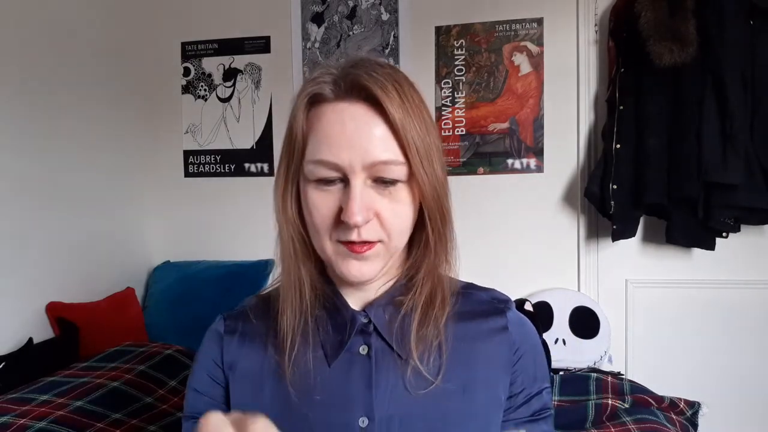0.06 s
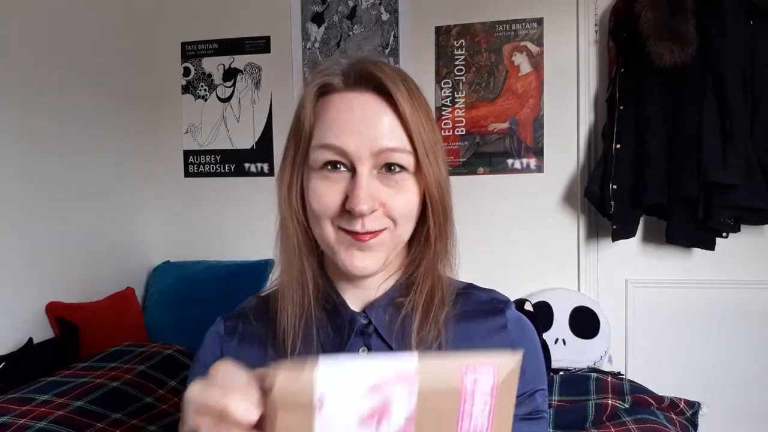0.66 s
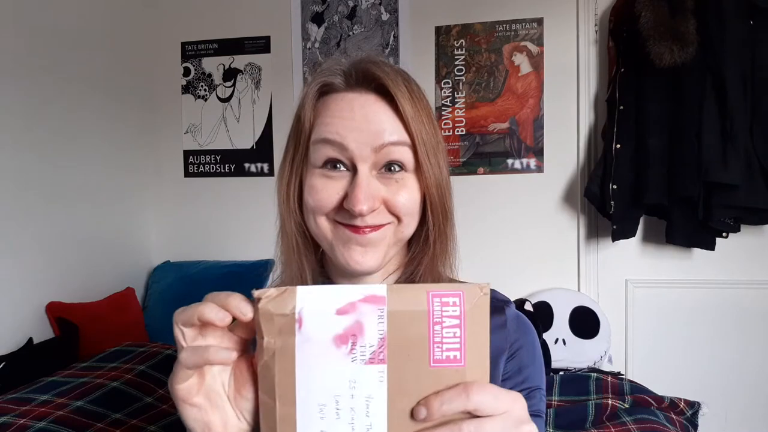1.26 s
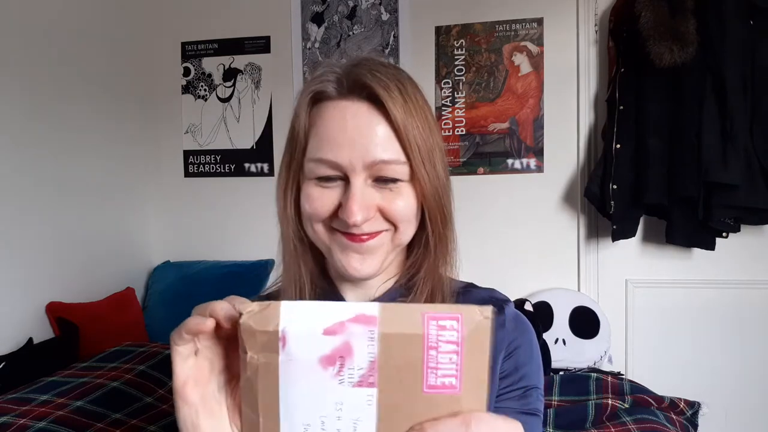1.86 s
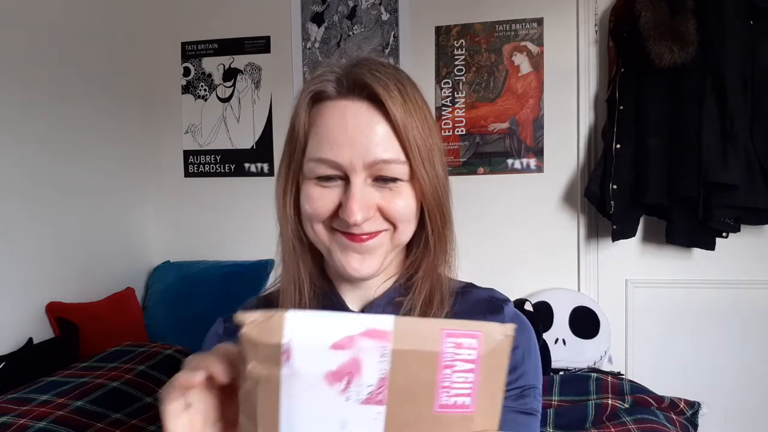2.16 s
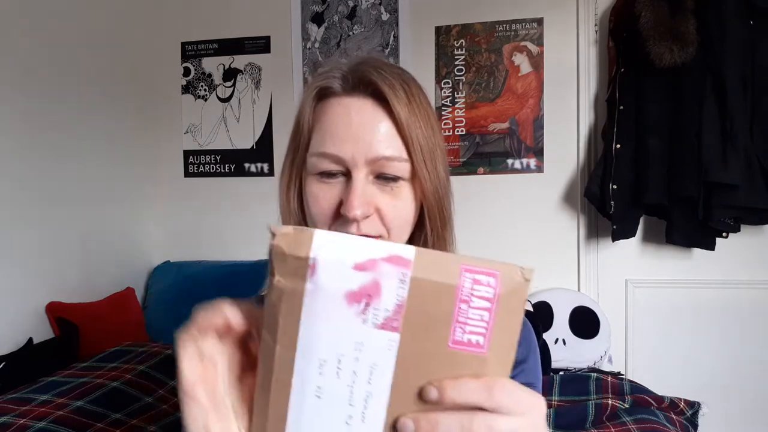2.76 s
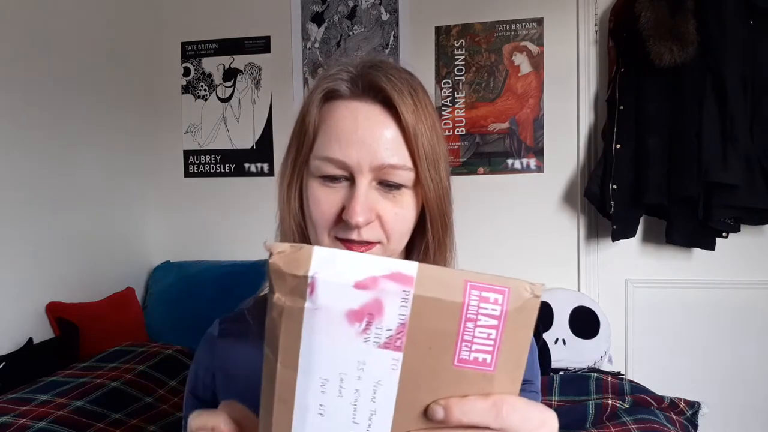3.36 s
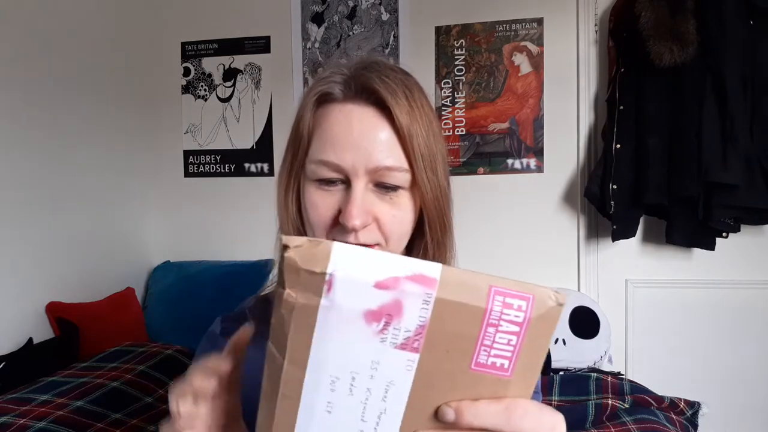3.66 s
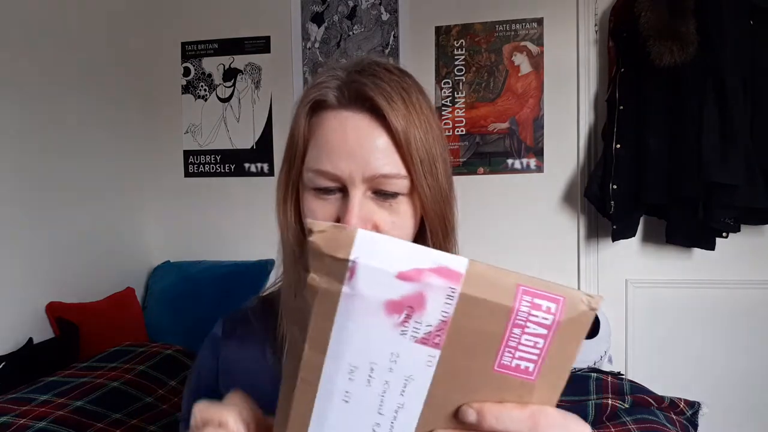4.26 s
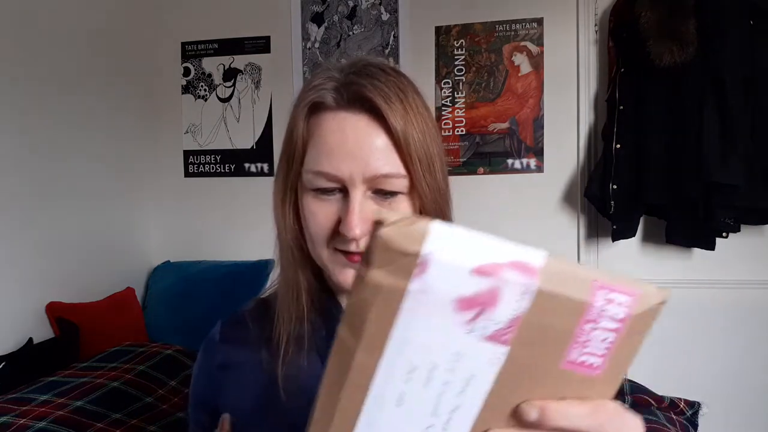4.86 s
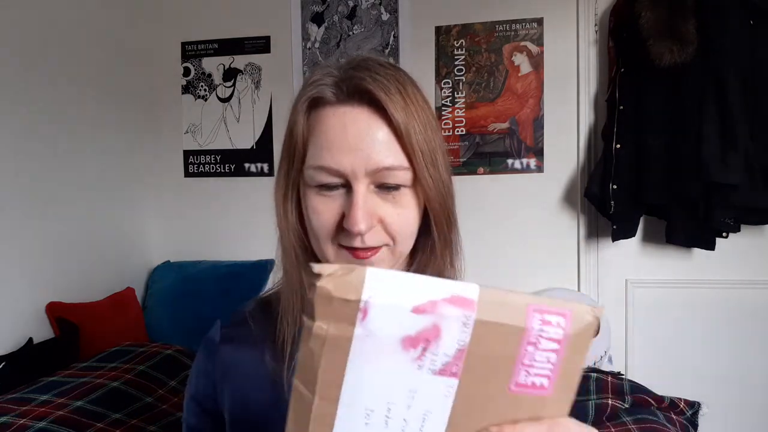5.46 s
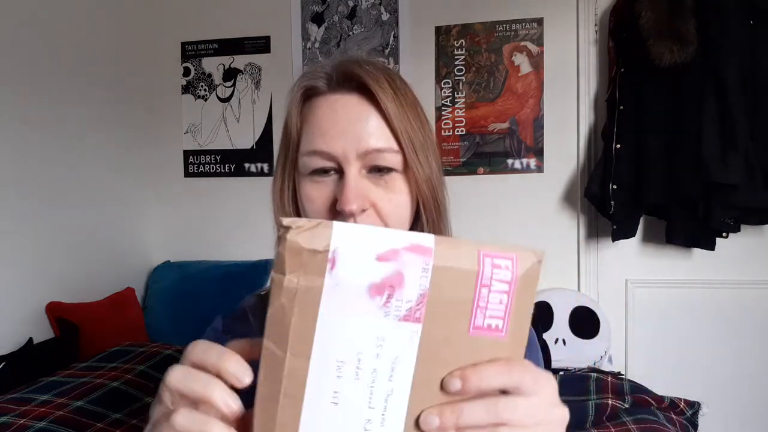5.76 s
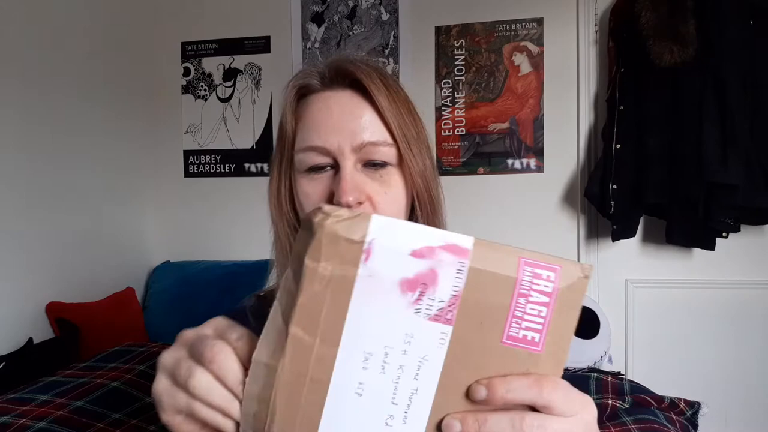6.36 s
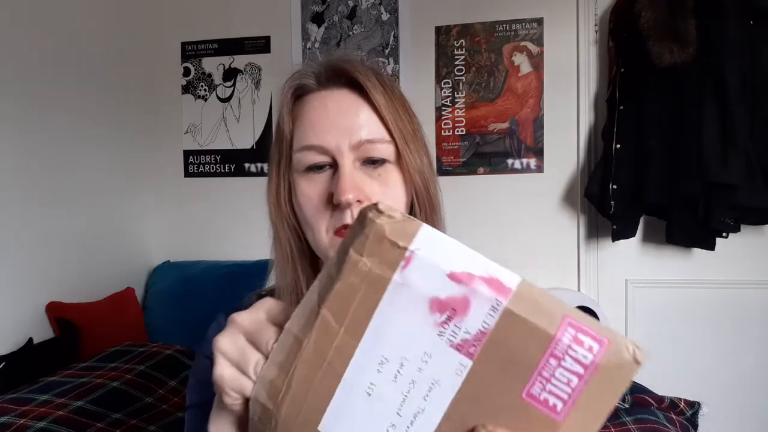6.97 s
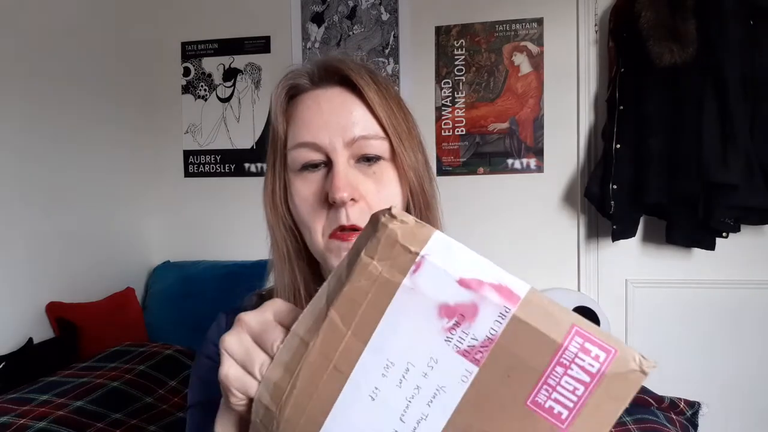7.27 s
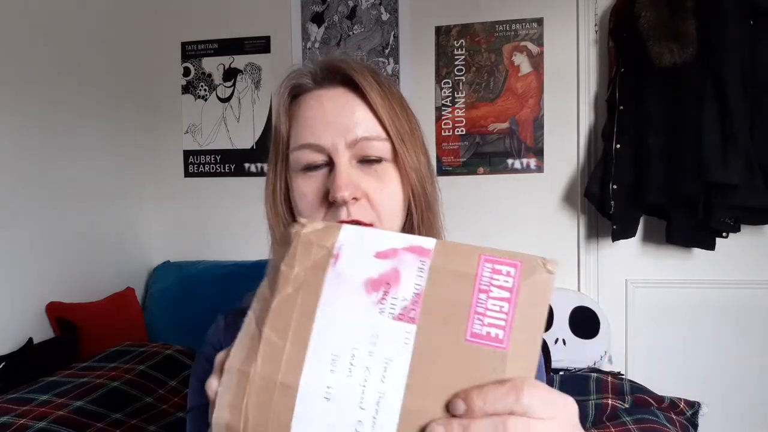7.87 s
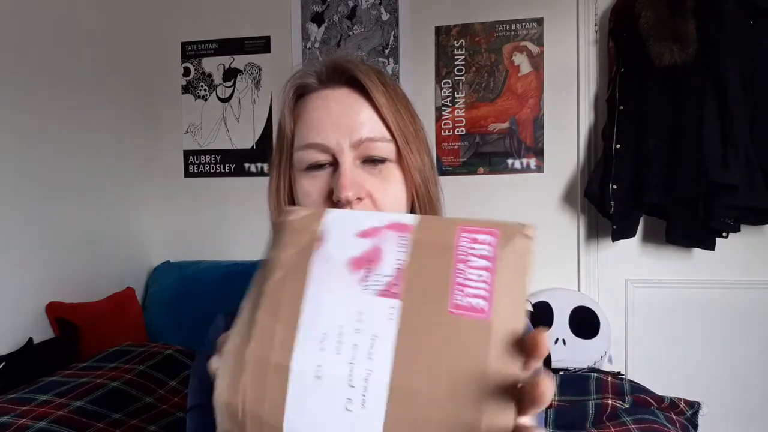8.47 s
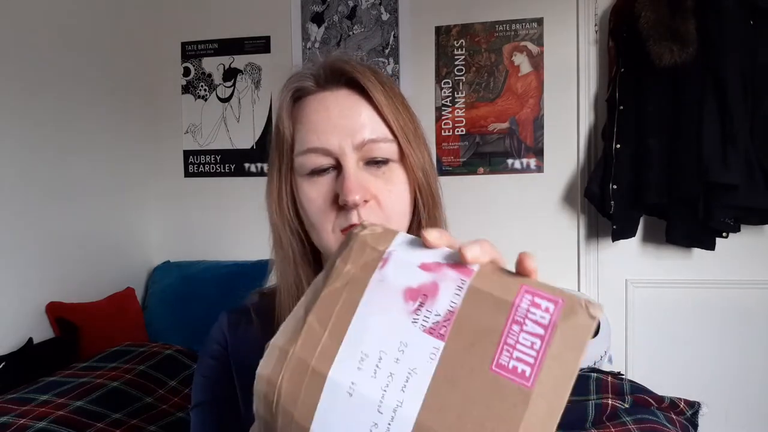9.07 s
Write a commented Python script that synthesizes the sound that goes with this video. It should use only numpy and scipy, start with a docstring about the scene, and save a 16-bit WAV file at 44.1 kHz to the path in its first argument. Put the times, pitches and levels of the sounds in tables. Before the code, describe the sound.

Hands tear open a paper-wrapped parcel in short rips, with crinkling, sharp snaps and rubbing, close by in a small room.

```python
"""A small furnished room: close by, hands open a parcel in brown paper.
Strips tear off in short pulls; breaking fibres rip, fizz and drum on the taut sheet.
Creases buckle with sharp snaps that thump the parcel, fingers rub over the paper's grain,
and a hand bumps the parcel softly. Short echoes; faint air, hiss and mains hum behind."""
import sys
import numpy as np
from scipy import signal
from scipy.fft import rfft, irfft
from scipy.io import wavfile

SR = 44100
rng = np.random.default_rng(int(sys.argv[2]) if len(sys.argv) > 2 else 0)


def transcribe(u):
    """Save the signal u as a 16-bit wav file named by the first command-line argument.

    u: samples, shape (n,) or (channels, n), limited to [-1, 1]; the rate is SR.
    q: integer samples, one column per channel.
    """
    v = np.clip(np.atleast_2d(u).T, -1, 1)
    q = np.round(v * 32767).astype(np.int16)
    wavfile.write(sys.argv[1], SR, q)


N = 407043

# Levels are relative within each layer.
# tearing pulls: start/s, rise/s, length/s, rip/dB, drum/dB, fizz/dB
TEAR_PULLS = [(0.589, 0.038, 0.05, -50, -63.5, -57.5), (0.847, 0.01, 0.012, -55, -53, -49.5),
              (1.822, 0.026, 0.053, -51.5, -47.5, -48.5), (2.009, 0.048, 0.07, -51.5, -49.5, -46),
              (2.644, 0.017, 0.095, -43, -43, -42), (2.748, 0.048, 0.13, -43, -44.5, -46.5),
              (2.978, 0.082, 0.14, -48, -51.5, -52.5), (3.177, 0.071, 0.14, -44, -49.5, -53),
              (3.328, 0.037, 0.086, -39, -42, -54.5), (4.024, 0.073, 0.18, -37, -36.5, -49),
              (4.171, 0.072, 0.08, -40, -48.5, -54), (4.323, 0.04, 0.094, -43.5, -46, -46.5),
              (4.447, 0.078, 0.067, -34.5, -35.5, -42), (7.403, 0.1, 0.09, -44.5, -45.5, -51.5)]
# buckling creases: t/s, facet f/Hz, facet/dB, crack/dB
CREASE_SNAPS = [(0.066, 620, -55, -62), (0.1155, 1720, -103, -51), (0.218, 1200, -79, -46.5),
                (0.2314, 1210, -38, -46), (0.474, 576, -66, -59), (0.6392, 640, -42, -48),
                (0.789, 900, -50.5, -64), (0.8107, 680, -49, -58), (0.9513, 1100, -58.5, -57.5),
                (1.225, 950, -51, -61.5), (2.2586, 870, -55.5, -69), (2.426, 700, -55, -61),
                (2.4603, 915, -50, -60), (2.563, 690, -49, -70), (2.9298, 1850, -45.5, -48),
                (3.1895, 1560, -53.5, -47.5), (3.8236, 710, -50.5, -58), (3.931, 1230, -58, -47),
                (4.039, 700, -55, -43), (4.303, 1100, -43, -48), (4.463, 1270, -40, -37),
                (4.519, 1500, -32, -36.5), (5.703, 906, -60.5, -84), (5.785, 650, -53, -59),
                (5.885, 1700, -54, -58.5), (6.0737, 570, -36.5, -40), (6.267, 730, -57, -75),
                (6.3082, 880, -47, -57), (6.3858, 1060, -48, -61), (6.9292, 864, -40, -64),
                (7.3895, 820, -31.5, -47.5), (7.8708, 725, -44, -56.5), (7.944, 820, -41.5, -49),
                (8.2124, 750, -38, -58), (8.2776, 740, -33, -50), (8.34, 960, -42, -67),
                (8.355, 930, -31.5, -41.5), (8.3997, 990, -38.5, -57), (8.4194, 960, -27.5, -48),
                (8.6796, 920, -38, -67), (8.753, 714, -40.5, -66), (8.7934, 940, -46, -77),
                (8.8074, 825, -36.5, -80), (8.8339, 1300, -31.5, -44.5)]
# tiny high ticks, of paper or a lip click: t/s, level/dB
THIN_TICKS = [(0.249, -44.5), (0.256, -60), (0.267, -56), (1.4235, -52.5)]
# hand strokes: centre/s, half length/s, rub/dB, hiss/dB
HAND_STROKES = [(0.068, 0.019, -66, -59.5), (0.138, 0.0039, -68, -57), (0.244, 0.02, -76, -46),
                (0.355, 0.014, -54.5, -72), (0.574, 0.0078, -50.5, -53.5), (0.763, 0.03, -63, -53.5),
                (1.095, 0.013, -60.5, -65), (1.228, 0.025, -57, -64), (1.81, 0.012, -68, -49),
                (2.573, 0.059, -64.5, -52.5), (2.929, 0.014, -53.5, -64), (3.89, 0.035, -54.5, -74),
                (3.99, 0.099, -62, -56.5), (5.815, 0.083, -60, -77), (6.028, 0.024, -72.5, -66.5),
                (6.209, 0.0076, -53.5, -47), (6.443, 0.012, -52, -50), (6.547, 0.024, -58, -51.5),
                (6.75, 0.047, -64.5, -61.5), (7.526, 0.027, -47.5, -67), (7.948, 0.023, -80, -46),
                (8.596, 0.034, -52.5, -52), (8.68, 0.029, -52.5, -61), (9.157, 0.044, -43, -57)]
# shifting grip: start/s, end/s, rub/dB
FINGER_GRIPS = [(0.064, 1.358, -69.5), (5.7, 5.93, -78), (6.156, 6.42, -57.5), (6.498, 6.667, -70.5),
                (6.915, 7.042, -66.5), (7.291, 8.209, -61), (8.521, 9.24, -60)]
# hand against parcel: t/s, peak/dB
HAND_BUMPS = [(6.076, -55), (8.21, -44), (8.28, -45), (8.455, -50.5), (8.916, -46)]
# modes of the loose sheet: f/Hz, width/Hz, level/dB
LOOSE_MODES = [(73.7, 7.5, -23), (184.3, 32, 3.5), (327.4, 130, -6), (422.4, 88, 1), (536, 38, -3),
               (930, 44, -9.5)]
# fibre bundles breaking: f/Hz, level/dB
RIP_SPECTRUM = [(450, -10.5), (720, -7.5), (900, 0.5), (1150, -7.5), (1700, -1.5), (3400, -8), (7500, -18)]
# fine fibres: f/Hz, level/dB
FIZZ_SPECTRUM = [(2500, -6.5), (4900, -3), (7500, -4), (9500, -9), (15800, -11)]
# skin on paper: f/Hz, level/dB
RUB_SPECTRUM = [(400, -7.5), (800, 1.5), (1200, 4), (2000, 1.5), (3800, -3.5), (8000, -12.5)]
# hollow parcel: f/Hz, level/dB
PARCEL_SPECTRUM = [(60, -7.5), (150, -35.5), (360, 3), (600, 6.5), (1000, -26.5)]
# still room: f/Hz, level/dB
AIR_SPECTRUM = [(25, -24), (55, -3), (110, -7), (350, -6), (700, -14), (4500, -19), (8700, -29),
                (11500, -15), (15800, -14)]
# direct sound: f/Hz, power share/1
DIRECT_SHARE = [(250, 0.78), (1000, 0.81), (4000, 0.62), (10000, 0.48)]
# left over right: f/Hz, level/dB
LEFT_BIAS = [(900, 4), (12000, 1)]


def tearing():
    """Fibres break in clumps as the tear sticks and runs; their tugging drums on the sheet."""
    rip_gain, drum_gain, fizz_gain = pull_gains()
    clumps = rms_one(from_db(2.5 * drift(rate_hz=420) + 1.6 * drift(rate_hz=97)))
    bundles = grains(per_s=2800, spread_db=0.5) * clumps
    fibres = grains(per_s=14000, spread_db=1.5) * clumps
    rip = from_db(5) * rip_gain * coloured(bundles, RIP_SPECTRUM)
    fizz = from_db(6) * fizz_gain * coloured(bundles + fibres, FIZZ_SPECTRUM)
    drum = from_db(4) * drum_gain * sheet(rms_one(bundles / np.sqrt(clumps)))
    return rip + fizz + drum


def pull_gains(stop_s=0.009, stop_share=0.055):
    """Each pull speeds up, runs and dies away; fizz comes in early, drumming only at speed."""
    t, gains = np.arange(N) / SR, 0
    for start_s, rise_s, length_s, *levels_db in TEAR_PULLS:
        stopping = np.clip(t - start_s - length_s, 0, 1) / (stop_s + stop_share * length_s)
        speed = np.clip((t - start_s) / rise_s, 0, 1) * np.exp(-stopping)
        rip, drum, fizz = speed, speed ** 1.27, speed ** 0.69
        gains = gains + from_db(levels_db)[:, None] * np.array([rip, drum, fizz])
    return gains


def sheet(drive, tight_hz=554, loose_from_s=2.6):
    """The wrapping rings in one mode while tight, in several, mostly lower, once loose."""
    click = 1.0 * (np.arange(SR // 2) == 0)
    tight_ring = resonance(click, tight_hz, width_hz=110)
    loose_ring = sum((-1) ** k * from_db(db) * resonance(click, hz, width_hz)
                     for k, (hz, width_hz, db) in enumerate(LOOSE_MODES))
    loose = np.arange(N) > loose_from_s * SR
    return sum(signal.oaconvolve(drive * when, ring / np.linalg.norm(ring))[:N]
               for when, ring in [(~loose, tight_ring), (loose, loose_ring)])


def snaps(give_s=0.00058, settle_s=0.0022, span_s=0.0023, chatter=0.27, crack_q=1.7):
    """A crease flips over: its facet rings, the fold cracks, the parcel thumps."""
    facets, thumps, cracks = np.zeros((3, N))
    size, lead = 1024, 200
    t = (np.arange(size) - lead) / SR
    envelope = np.exp(-np.maximum(t / settle_s, -t / give_s))
    for at_s, facet_hz, facet_db, crack_db in CREASE_SNAPS:
        at = round(at_s * SR) - lead + np.arange(size)
        flip = (t == 0) + chatter * rng.standard_normal(size) * envelope
        flip *= np.sqrt(span_s * SR) / np.linalg.norm(flip)
        ring = resonance(resonance(flip, facet_hz, width_hz=facet_hz), facet_hz, width_hz=2300)
        facets[at] += from_db(facet_db) * with_energy(ring, flip)
        thump_db = facet_db - 17 * np.log2(facet_hz / 700)   # large, low facets thump harder
        thumps[at] += from_db(thump_db) * flip
        crack_hz = min(3750 * 2 ** ((crack_db - facet_db) / 41), SR / 4)   # brighter as it stands out
        crack = resonance(flip, crack_hz, crack_hz / crack_q)
        cracks[at] += from_db(crack_db) * with_energy(crack, flip)
    body = from_db(6.5) * coloured(thumps, PARCEL_SPECTRUM) + from_db(-4) * sheet(thumps)
    return from_db(6) * facets + body + from_db(9.5) * cracks


def settling(re_crack_db=-4.5, decay_s=0.023):
    """The paper settles after each snap with a brief fine crackle."""
    starts = np.zeros(N)
    for at_s, _, _, crack_db in CREASE_SNAPS:
        starts[round(at_s * SR)] = from_db(crack_db + re_crack_db)
    envelope = signal.lfilter([1], [1, -np.exp(-1 / (decay_s * SR))], starts + 1e-18)
    return envelope * coloured(grains(per_s=12000, spread_db=-3.5), RIP_SPECTRUM)


def sliding():
    """Skin catches on the paper's grain; the sheet gives in crinkles and pops."""
    rub_gain, sheet_gain, hiss_gain = hand_gains()
    friction = grains(per_s=14000, spread_db=0.5) * rms_one(from_db(2.23 * drift(rate_hz=110)))
    crinkles = grains(per_s=220, spread_db=3.5)
    catching = friction + from_db(-5.5) * crinkles
    light_touch = highpass(catching, 267, order=4)   # barely moves the low modes
    rub = from_db(1) * coloured(catching, RUB_SPECTRUM) + from_db(-3) * pops()
    ring = from_db(0.16) * sheet(light_touch)
    hiss = from_db(-1.5) * coloured(friction + from_db(-16) * crinkles, FIZZ_SPECTRUM)
    return rub_gain * rub + sheet_gain * ring + hiss_gain * hiss


def hand_gains(edge_s=0.0039, waver_db=3, grip_hiss_db=-28.5):
    """Strokes swell and fade over a restless grip; the sheet follows the rub in part."""
    t = np.arange(N) / SR
    grip = sum(from_db(db) * np.clip(np.minimum(t - start_s, end_s - t) / edge_s, 0, 1)
               for start_s, end_s, db in FINGER_GRIPS)
    grip *= from_db(waver_db * drift(rate_hz=14))
    stroke_power = sum(from_db(levels_db)[:, None] ** 2 * (1 - np.tanh((t - centre_s) / half_s) ** 2)
                       for centre_s, half_s, *levels_db in HAND_STROKES)
    rub_gain, hiss_gain = np.sqrt(stroke_power + np.array([grip, from_db(grip_hiss_db) * grip]) ** 2)
    sheet_gain = from_db(-59) * (rub_gain / from_db(-49)) ** 0.56
    return rub_gain, sheet_gain, hiss_gain


def pops(low_hz=316, high_hz=1700, q=2.6, sizes=5):
    """Dents of several sizes pop at random, each with a short hollow ring; rms 1."""
    clicks = grains(per_s=51, spread_db=1)
    dent = rng.integers(0, sizes, N)
    out = np.zeros(N)
    for k, hz in enumerate(np.geomspace(low_hz, high_hz, sizes)):
        ring = resonance(clicks * (dent == k), hz, hz / q)
        out += rms_one(resonance(ring, hz, 2 * hz))
    return rms_one(out)


def ticks(hz=5160, q=1.04, decay_s=0.00067, size=512):
    """Tiny high ticks, of paper or a lip click: very short bursts with no body."""
    out = np.zeros(N)
    fade = np.exp(-np.arange(size) / (decay_s * SR))
    for at_s, db in THIN_TICKS:
        burst = rng.standard_normal(size) * fade
        ring = resonance(resonance(burst, hz, hz / q), hz, hz / q)
        out[round(at_s * SR) + np.arange(size)] += from_db(db) * rms_one(ring)
    return out


def bumps(contact_s=0.0015):
    """A soft push swings the whole parcel for a few cycles."""
    t = np.arange(SR // 4) / SR
    swing = resonance(t * np.exp(-t / contact_s), hz=88, width_hz=43)
    pushes = np.zeros(N)
    for at_s, db in HAND_BUMPS:
        pushes[round(at_s * SR)] = from_db(db)
    return signal.oaconvolve(pushes, swing / np.abs(swing).max())[:N]


def room(x, stretches=60, size=16384):
    """The parcel keeps moving, so each short stretch meets new echoes."""
    out = np.zeros((2, N + size))
    for at in np.array_split(np.arange(N), stretches):
        out[:, at[0]:at[-1] + size] += signal.fftconvolve(x[None, at], room_response(size), axes=1)
    return out[:, size // 2:size // 2 + N]


def room_response(size, t60_s=0.18, build_s=0.004, shared_below_hz=415, lead_s=2e-5, wander_s=2.5e-5):
    """Direct sound plus a diffuse tail shared in the bass; left louder, right mostly earlier."""
    t, hz = np.arange(size) / SR, np.fft.rfftfreq(size, 1 / SR)
    decay = from_db(-60 * t / t60_s) * (1 - np.exp(-t / build_s))
    tails = rfft(rng.standard_normal((3, size)) * decay) / np.linalg.norm(decay)
    shared = 1 / (1 + (hz / shared_below_hz) ** 2)
    echoes = np.sqrt(shared) * tails[0] + np.sqrt(1 - shared) * tails[1:]
    direct = at_hz(DIRECT_SHARE, hz)
    arrivals = np.sqrt(direct) + np.sqrt(1 - direct) * echoes
    right_lead_s = lead_s + wander_s * rng.standard_normal()
    balance = from_db(np.outer([1, -1], at_hz(LEFT_BIAS, hz)) / 2)
    delay = np.exp(1j * np.pi * np.outer([-1, 1], hz) * right_lead_s)
    return np.fft.fftshift(irfft(balance * delay * arrivals), axes=1)


def background(air_db=-72.3, hum_hz=49.6, hum_db=-80):
    """Still room: a murmur of air, thin hiss, a trace of mains hum."""
    shared, left, right = (coloured(noise, AIR_SPECTRUM) for noise in rng.standard_normal((3, N)))
    hum = np.sqrt(2) * np.sin(2 * np.pi * hum_hz * np.arange(N) / SR)
    return from_db(air_db) * (shared + np.array([left, right])) + from_db(hum_db) * hum


def grains(per_s, spread_db):
    """Clicks of random time, size and sign; rms 1."""
    sizes = from_db(spread_db * np.minimum(rng.exponential(1, N), 4))
    return rms_one((rng.random(N) < per_s / SR) * sizes * rng.choice([-1, 1], N))


def drift(rate_hz):
    """Ramps between random values; rms 1."""
    steps = np.arange(N) / SR * rate_hz
    return rms_one(np.interp(steps, np.arange(N // 20), rng.standard_normal(N // 20)))


def coloured(x, spectrum, size=4096):
    """Minimum-phase filter; keeps the power of white input."""
    gain = from_db(at_hz(spectrum, np.fft.rfftfreq(size, 1 / SR)))
    cepstrum = irfft(np.log(gain))
    cepstrum[1:size // 2] *= 2
    cepstrum[size // 2 + 1:] = 0
    response = irfft(np.exp(rfft(cepstrum)))
    return signal.oaconvolve(x, response / np.linalg.norm(response))[:N]


def resonance(x, hz, width_hz):
    """Two-pole band-pass, peak gain 1."""
    radius = np.exp(-np.pi * width_hz / SR)
    feedback = [1, -2 * radius * np.cos(2 * np.pi * hz / SR), radius ** 2]
    return signal.lfilter(np.array([1, 0, -1]) * (1 - radius ** 2) / 2, feedback, x + 1e-18)


def highpass(x, hz, order):
    """Maximally flat bass cut."""
    return signal.sosfilt(signal.butter(order, hz, "high", fs=SR, output="sos"), x)


def at_hz(table, hz):
    """Interpolate a table over log frequency."""
    knots_hz, values = np.transpose(table)
    return np.interp(np.log(np.maximum(hz, 1)), np.log(knots_hz), values)


def with_energy(x, reference):
    """Scale to the energy of reference."""
    return x * np.linalg.norm(reference) / np.linalg.norm(x)


def rms_one(x):
    """Scale to rms 1."""
    return x / np.sqrt(np.mean(x ** 2) + 1e-20)


def from_db(db):
    """Decibels to gain."""
    return 10 ** (np.asarray(db) / 20)


def scene():
    """Paper and parcel in the room, over the background."""
    unwrapping = tearing() + sliding() + snaps() + ticks() + settling()
    radiated = highpass(unwrapping, 68, order=2)   # sheet too small for deep bass
    return room(radiated + bumps()) + background()


def record(dry, low_hz=42, high_hz=15950):
    """The microphone loses the deepest bass; the top is cut steeply."""
    lowpass = signal.firwin(401, high_hz, fs=SR)
    return signal.oaconvolve(highpass(dry, low_hz, order=4), lowpass[None], mode="same", axes=1)


dry = scene()
out = record(dry)
transcribe(out)
```